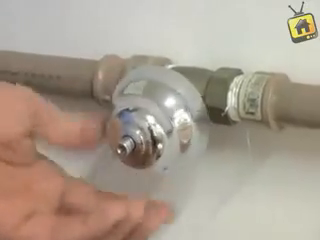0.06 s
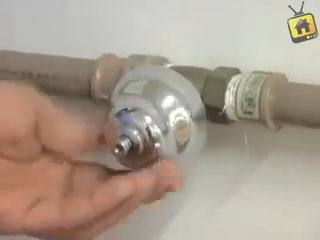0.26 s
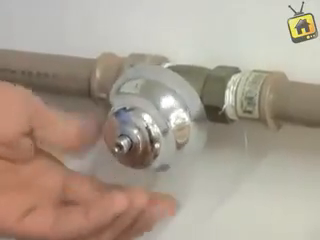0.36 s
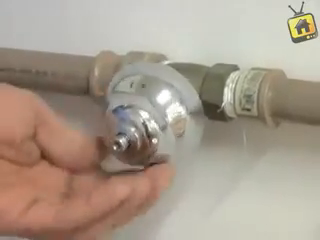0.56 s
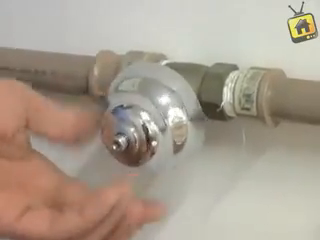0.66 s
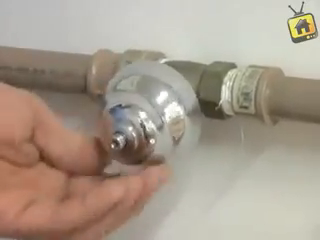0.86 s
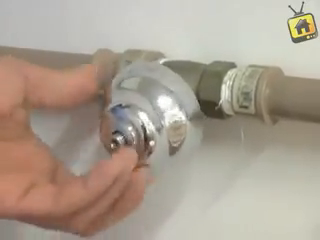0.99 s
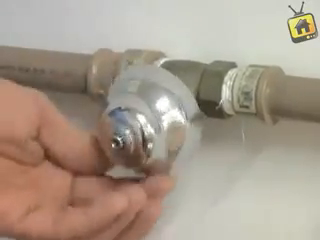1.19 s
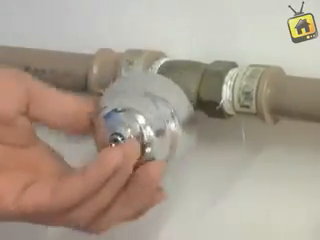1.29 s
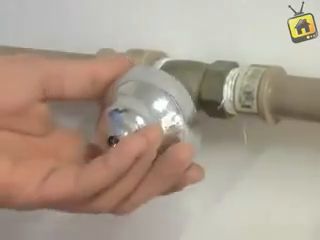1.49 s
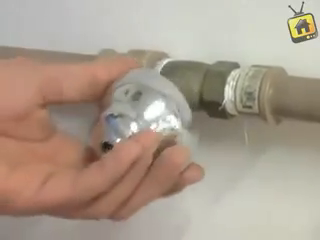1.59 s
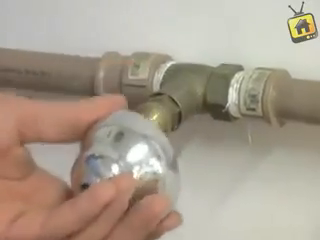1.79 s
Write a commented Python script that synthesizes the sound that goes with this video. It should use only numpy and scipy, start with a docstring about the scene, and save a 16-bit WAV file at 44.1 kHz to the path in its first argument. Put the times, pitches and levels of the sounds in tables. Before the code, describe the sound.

Close metallic scraping and knocking as a hand twists a cover off a wall valve.

```python
"""A hand works a chrome cover loose from a wall valve, close by in a small hard room with quiet noise.
First the cover scrapes along its stem, catches and knocks: the thin shell clanks, and each knock
thumps the pipework, which rings on briefly. Further rubbing sets the cover humming. Just after
one second comes a cluster of hard knocks; at last the cover slides off and chimes faintly."""
import sys
import numpy as np
from scipy import signal
from scipy.fft import rfft, irfft
from scipy.io import wavfile
from scipy.ndimage import uniform_filter1d

SR = 44100
rng = np.random.default_rng(int(sys.argv[2]) if len(sys.argv) > 2 else 0)


def dump_mix(stems):
    """Bounce the given channels to the path in sys.argv[1] as a 16-bit WAV at rate SR."""
    frames = np.atleast_2d(stems).T  # one column per channel
    limited = np.clip(frames, -1, 1)  # hard clip at full scale
    pcm = np.round(limited * 32767).astype(np.int16)
    wavfile.write(sys.argv[1], SR, pcm)


N = 81585

# Each row: start in seconds, clack in dB, hardness in Hz, tick in dB, thump in dB, thump pitch in Hz.
COVER_KNOCKS = [(.040, -27, 830, -83, -32.5, 261), (0.2457, -11.5, 4320, -24, -19, 223),
                (0.3213, -15, 2300, -30, -22.5, 275), (.339, -19, 980, -51, -19.5, 231),
                (0.401, -29.5, 1100, -51, -27, 421), (.536, -36.5, 2000, -64, -22.5, 237),
                (.628, -18.5, 2660, -66, -17.5, 228), (0.673, -25.5, 2080, -66, -23.5, 333),
                (0.829, -26.5, 770, -54, -18, 224.5), (0.914, -24.5, 1850, -68, -24, 232),
                (.9545, -31.5, 1460, -41.5, -27, 171), (1.122, -16, 2620, -31, -23, 325),
                (1.13, -11, 2080, -27, -31, 296), (1.142, -13.5, 1080, -28, -14, 235),
                (1.174, -26, 1220, -33.5, -14, 240), (1.262, -25, 1180, -36, -22.5, 224.4),
                (1.331, -22.5, 1390, -27.5, -28.5, 554), (1.612, -33, 635, -66, -37, 280),
                (1.633, -26, 710, -57, -23, 237.5), (1.648, -25.5, 500, -60, -25, 244),
                (1.708, -34.5, 600, -71, -32.5, 372)]
# Each row: start, peak and end in seconds, scrape in dB, hardness in Hz, hiss in dB.
STEM_SLIDES = [(0, 0.017, 0.19, -36.5, 1900, -69), (0.202, 0.25, 0.37, -21.5, 2490, -35),
               (0.248, 0.325, 0.55, -26, 2320, -43.5), (0.492, 0.539, 0.63, -38, 2500, -52.5),
               (0.585, 0.627, 0.79, -23, 2060, -44), (0.785, 0.838, 0.91, -30, 760, -60),
               (0.873, 0.919, 1.042, -22.5, 1740, -44), (1.084, 1.125, 1.295, -19.5, 1320, -32.5),
               (1.202, 1.266, 1.372, -32.5, 1270, -43.5), (1.282, 1.32, 1.656, -35, 1000, -49.5),
               (1.523, 1.539, 1.72, -43, 770, -76), (1.524, 1.631, 1.746, -28, 653, -47)]
# Each row: start in seconds, level in dB, centre and spread of the excited band in Hz.
SHELL_TOUCHES = [(.008, -50, 7950, 800), (.008, -54, 3855, 100), (.02, -20, 1470, 100),
                 (.2457, -16, 2170, 200), (.2457, -20, 1290, 100), (.2457, -25, 3450, 300),
                 (.3211, -22, 1865, 80), (.536, -38, 2070, 50), (.536, -42, 3290, 200),
                 (.628, -23, 2150, 300), (.83, -32, 2070, 50), (.83, -45, 3450, 200),
                 (.895, -59, 8800, 1300), (.935, -29, 2070, 50), (.945, -60, 8500, 1300),
                 (1.225, -57, 8500, 1000), (1.122, -24, 3300, 300), (1.131, -25, 1930, 200),
                 (1.262, -49, 10600, 900), (1.415, -64, 9372, 300), (1.581, -55, 10500, 2000),
                 (1.6, -49, 3855, 100), (1.615, -39, 1470, 100), (1.625, -55, 10500, 2000)]
# Each row: peak time in seconds, build-up in seconds, hum level in dB.
COVER_RUBS = [(0.406, 0.0051, -25.5), (.565, 0.044, -27.5), (0.711, 0.031, -26), (0.869, 0.037, -23),
              (0.959, 0.082, -16), (1.201, 0.17, -27.5), (1.363, 0.047, -23), (1.465, 0.048, -29),
              (1.651, 0.06, -18)]
# Modes of pipework and shell. Each list in turn: frequency in Hz, level in dB, t60 in seconds.
PIPE_MODE_HZ = [156, 198, 244, 344, 410, 543, 735, 874, 1036, 1132]
PIPE_MODE_DB = [6.9, 2.3, 8.4, 12.2, 11.1, 4.75, 0.93, 3.4, 1.1, 1.7]
PIPE_MODE_T60_S = [0.22, 0.17, 0.35, 0.26, 0.49, 0.24, 0.072, 0.16, 0.27, 0.51]
SHELL_MODE_HZ = [1290, 1470, 1865, 2005, 2070, 2170, 2240, 3290, 3490, 3855, 7165, 8445, 9372, 10140, 11900,
                 12680]
SHELL_MODE_DB = [1.5, 0.5, 8, 5, 2, 2, 3.5, 13, 5.5, 4.5, 7, 2, 7.5, 9, -9, -14]
SHELL_MODE_T60_S = [0.12, 0.097, 0.1, 0.073, 0.19, 0.12, 0.052, 0.033, 0.037, 0.25, 0.17, 0.14, 0.35, 0.087,
                    0.37, 0.27]
# Spectral envelopes. Each row: frequency in Hz, relative level in dB.
CLACK_SPECTRUM = [(60, -58.5), (130, -7), (250, -5.5), (480, -2), (1000, -3.5), (2200, 1), (2800, -7.5),
                  (3500, -3), (4300, -19.5), (10000, -33)]
TICK_SPECTRUM = [(500, -6.5), (2500, -12.5), (3600, 10), (5000, 7), (6000, -1), (8200, -2.5), (10200, -2.5),
                 (10900, -24.5), (12500, -13.5)]
SIDE_SPECTRUM = [(300, -12.5), (4000, -5.5), (9000, -15.5)]
ROOM_NOISE_SPECTRUM = [(25, 11.5), (100, -3), (170, -0.5), (400, -3), (800, -8.5), (4000, -25),
                       (9500, -40.5), (11000, -48)]
# Reverberation times. Each row: frequency in Hz, t60 in seconds.
ROOM_DECAY = [(150, 0.37), (500, 0.25), (2000, 0.11), (5000, 0.39), (10000, 0.14)]

PIPE_PUSH_DB, SLIDE_PUSH_DB = 13, 5.5
ROOM_DB, THUMP_ROOM_DB, ROOM_SIDE_DB, NOISE_SIDE_DB = -4, -5, -12.5, -10.5


def knocks(rise_s=.0032, lag_s=.0016):
    """Impact: each brief contact force gives a clack with a metal tick, a thump and a push on the pipe."""
    clacks, thumps, pushes = np.zeros((3, N))
    t = np.arange(SR // 5) / SR
    swell = t / rise_s * np.exp(1 - t / rise_s)
    for start, db, hard_hz, tick_db, thump_db, thump_hz in COVER_KNOCKS:
        contact = colour(CLACK_SPECTRUM, hard_hz)
        add(clacks, start, undb(db) * through(chatter(t, t60=.047), contact))
        add(clacks, start, undb(tick_db) * through(chatter(t, t60=.026), colour(TICK_SPECTRUM)))
        add(thumps, start + lag_s, undb(thump_db) * swell * np.sin(2 * np.pi * thump_hz * t))
        add(pushes, start, undb(db + PIPE_PUSH_DB) * contact)
    return clacks, thumps, pushes


def chatter(t, t60):
    """Contact chatter: one sharp impulse is followed by dense, fading ones."""
    impulses = rng.choice([-1., 1.], len(t)) * fade(t, t60)
    impulses[0] = np.sqrt(.0009 * SR)
    return impulses


def slides(slips_per_s=1600, spread_db=4.5, range_db=41.5):
    """Stick-slip friction: random slips swell as the cover moves and die away as it catches."""
    out, t = np.zeros(N), np.arange(N) / SR
    for start, peak, end, db, hard_hz, hiss_db in STEM_SLIDES:
        slips = (rng.random(N) < slips_per_s / SR) * rng.choice([-1, 1], N)
        strength = undb(spread_db * rng.standard_normal(N).clip(-2, 2))
        effort = undb(np.interp(t, [start, peak, end], [-range_db, 0, -range_db]))
        effort *= (t > start) * (t < end)
        contact = undb(db) * colour(CLACK_SPECTRUM, hard_hz) + undb(hiss_db) * colour(TICK_SPECTRUM)
        out += through(unit(slips * strength) * np.sqrt(N) * effort, contact)
    return out


def pipework(force):
    """Forced vibration: the damped modes of pipework and seated cover ring on after each push."""
    response, t = np.zeros(SR), np.arange(SR) / SR
    for hz, db, t60 in zip(PIPE_MODE_HZ, PIPE_MODE_DB, PIPE_MODE_T60_S):
        gain = undb(db) * 2 * np.log(1000) / (t60 * SR)  # makes db the gain at resonance
        response += gain * fade(t, t60) * np.cos(2 * np.pi * hz * t)
    return through(force, response)


def shell(rise_s=.004, flutter_db=2.5, jitter_rad=.4):
    """Modal ringing: the place of touch favours some shell modes, and the grip makes them waver."""
    out, t = np.zeros(N), np.arange(N) / SR
    for hz, mode_db, t60 in zip(SHELL_MODE_HZ, SHELL_MODE_DB, SHELL_MODE_T60_S):
        level = np.zeros(N)
        ring = (1 - np.exp(-t / rise_s)) * fade(t, t60)
        for start, db, centre_hz, spread_hz in SHELL_TOUCHES:
            coupling = np.exp(-np.square((hz - centre_hz) / spread_hz))
            add(level, start, coupling * undb(db + mode_db) * ring)
        level *= undb(flutter_db * wander())
        out += level * np.sin(2 * np.pi * hz * t + jitter_rad * wander())
    return out


def cover_hum(hz=391, pitch_spread=.025, t60=.16, flutter_db=2.5):
    """Resonance driven by friction: a hollow, unsteady note builds as the cover rubs, then rings out."""
    level, t = np.zeros(N), np.arange(N) / SR
    for peak, build, db in COVER_RUBS:
        rise = np.interp(t, [peak - build, peak], [0, 1])
        decay = fade(np.maximum(t - peak, 0), t60)
        level = np.maximum(level, undb(db) * rise * decay)
    phase = 2 * np.pi * np.cumsum(hz * (1 + pitch_spread * wander())) / SR
    return level * undb(flutter_db * wander()) * np.sin(phase)


def room_tail(onset_s=.00043):
    """Reverberation: diffuse reflections decay at a separate rate in each octave."""
    t = np.arange(SR * 3 // 5) / SR
    noise, hz = rfft(rng.standard_normal(len(t))), np.fft.rfftfreq(len(t), 1 / SR)
    octaves_hz = np.geomspace(100, 12800, 8)
    tail = np.zeros(len(t))
    for centre, weights in zip(octaves_hz, np.eye(8)):
        band = lookup(list(zip(octaves_hz, weights)), hz)
        tail += irfft(noise * band, len(t)) * fade(t, lookup(ROOM_DECAY, centre))
    return unit(tail * (1 - np.exp(-np.square(t / onset_s))))


def room_noise(db=-44):
    """Ambient noise: steady random pressure, strongest in the bass."""
    return undb(db) * through(rng.standard_normal(N), colour(ROOM_NOISE_SPECTRUM))


def colour(points, hard_hz=np.inf, size=2048, dull_order=3.05):
    """Minimum-phase response of a spectrum; a soft contact dulls it above hard_hz."""
    hz = np.fft.rfftfreq(size, 1 / SR)
    magnitude = undb(lookup(points, hz)) / np.hypot(1, (hz / hard_hz) ** dull_order)
    cepstrum = irfft(np.log(magnitude))
    cepstrum[1:size // 2] *= 2
    cepstrum[size // 2 + 1:] = 0
    return unit(irfft(np.exp(rfft(cepstrum))))


def wander(steps_per_s=130):
    """Smoothed random modulation with a spread near 1."""
    hold = int(SR / steps_per_s)
    steps = np.repeat(rng.standard_normal(N // hold + 1), hold)
    return 1.3 * uniform_filter1d(uniform_filter1d(steps, hold), hold)[:N]


def undb(db):
    """Decibels to amplitude ratio."""
    return 10 ** (np.asarray(db) / 20)


def unit(x):
    """Normalisation to unit energy."""
    return x / np.sqrt(np.sum(x ** 2))


def fade(t, t60):
    """Exponential decay by 60 dB in t60."""
    return np.exp(-np.log(1000) * t / t60)


def lookup(points, hz):
    """Interpolation on a log-frequency axis."""
    frequencies, values = np.array(points).T
    return np.interp(np.log(hz + 1), np.log(frequencies), values)


def through(x, response):
    """Convolution with an impulse response."""
    return signal.fftconvolve(x, response)[:N]


def add(out, start_s, x):
    """Superposition of a delayed sound."""
    i = max(int(start_s * SR), 0)
    out[i:i + len(x)] += x[:N - i]


def scene():
    """Superposition: direct sound is central; uncorrelated reflections and noise give width."""
    clacks, thumps, pushes = knocks()
    scrape = slides()
    contacts = clacks + scrape + shell()
    low = thumps + pipework(thumps + pushes + undb(SLIDE_PUSH_DB) * scrape)
    into_room = undb(ROOM_DB) * (contacts + undb(THUMP_ROOM_DB) * low)
    mid_noise, side_noise = room_noise(), undb(NOISE_SIDE_DB) * room_noise()
    mid = contacts + low + cover_hum() + through(into_room, room_tail()) + mid_noise
    lateral = through(into_room, room_tail())
    side = undb(ROOM_SIDE_DB) * through(lateral, colour(SIDE_SPECTRUM)) + side_noise
    return np.array([mid + side, mid - side])


def record(dry):
    """Band limiting: filters thin the deep bass and cut the top."""
    low_cut_hz, top_hz = 112, 13000
    thinned = signal.lfilter(*signal.butter(2, low_cut_hz, "high", fs=SR), dry)
    return signal.sosfilt(signal.ellip(8, .2, 70, top_hz, fs=SR, output="sos"), thinned)


dry = scene()
out = record(dry)
dump_mix(out)
```